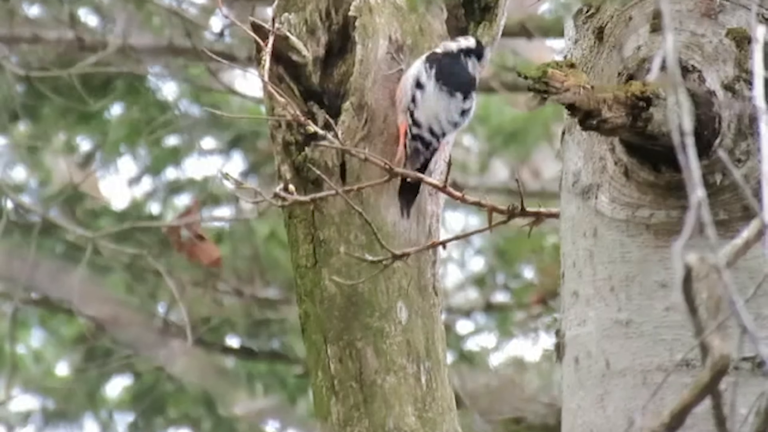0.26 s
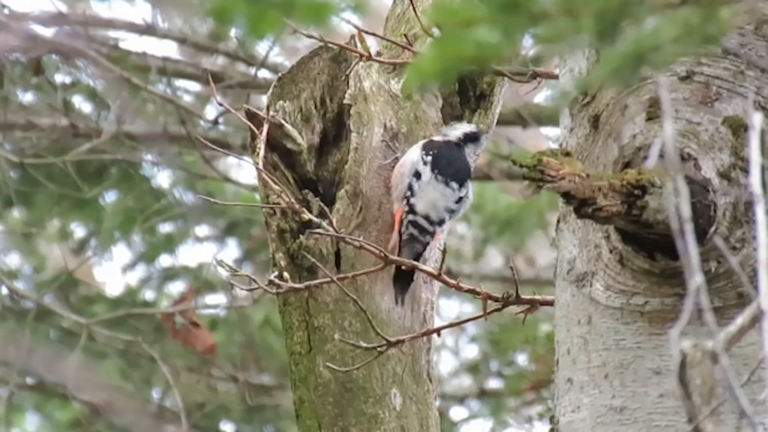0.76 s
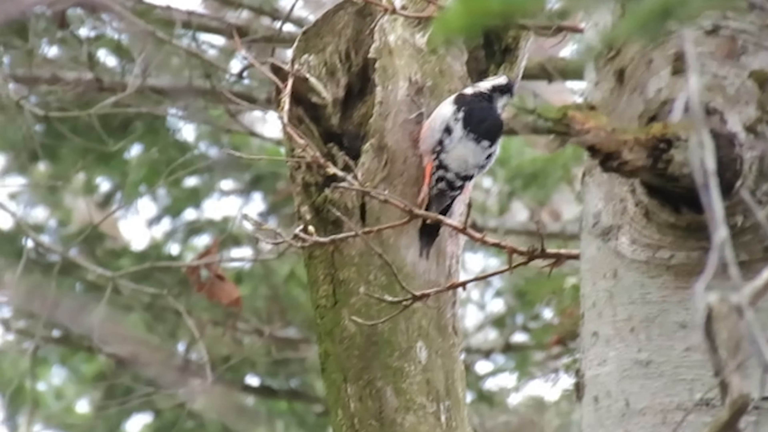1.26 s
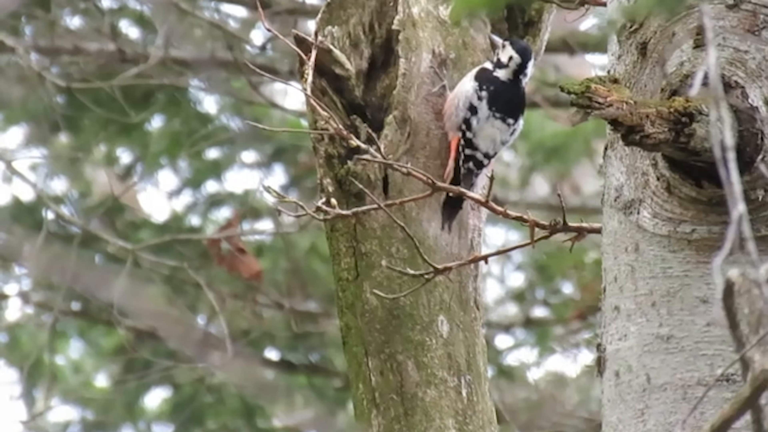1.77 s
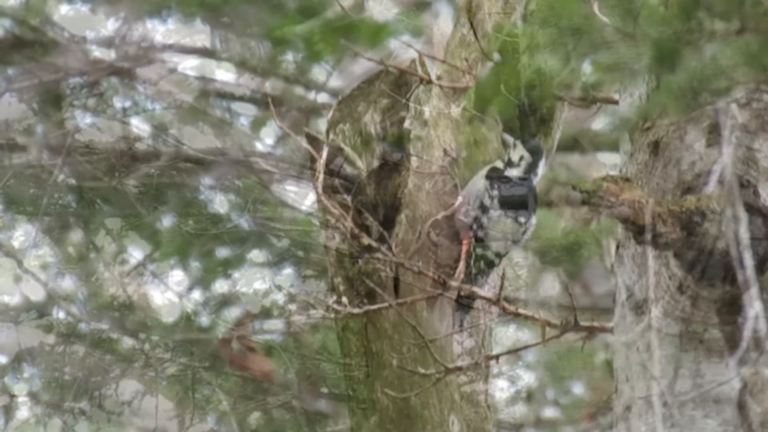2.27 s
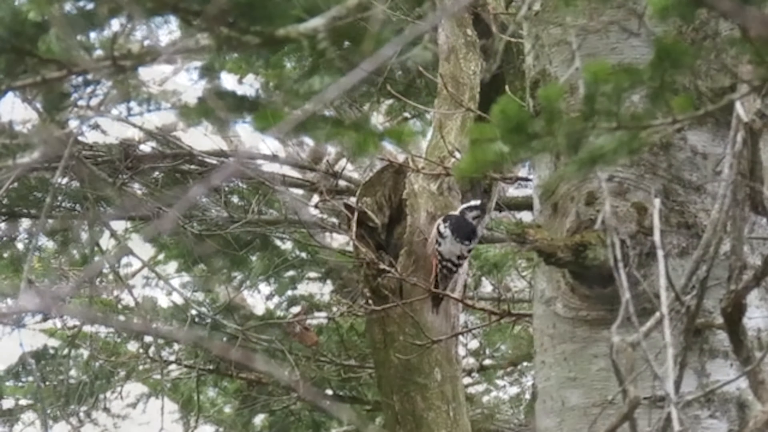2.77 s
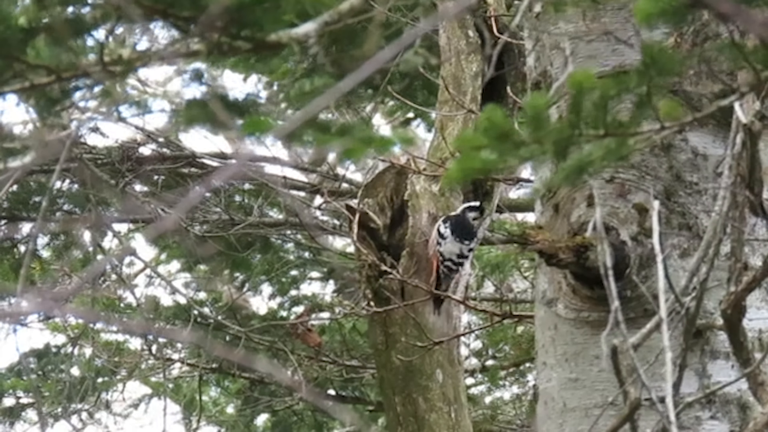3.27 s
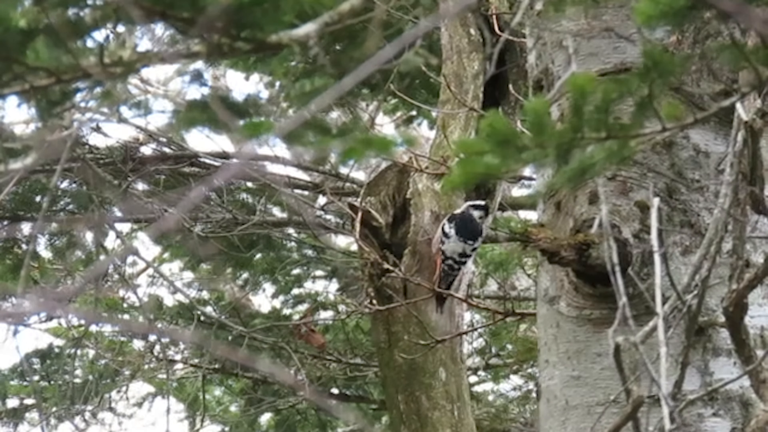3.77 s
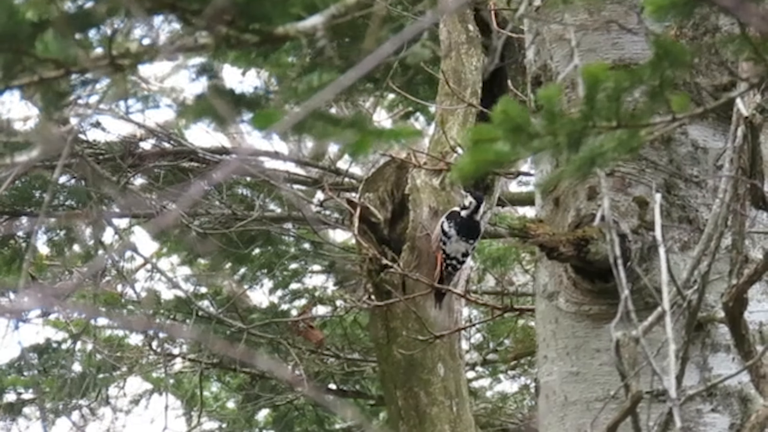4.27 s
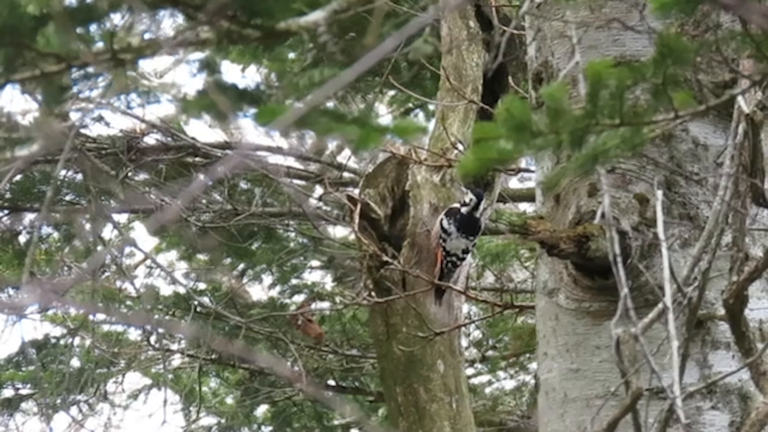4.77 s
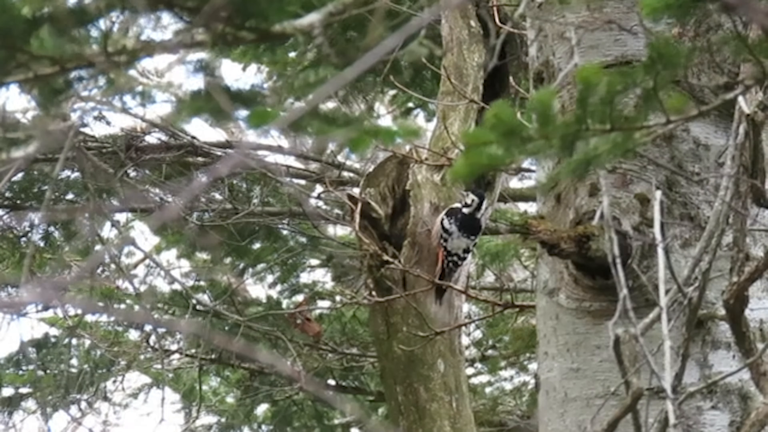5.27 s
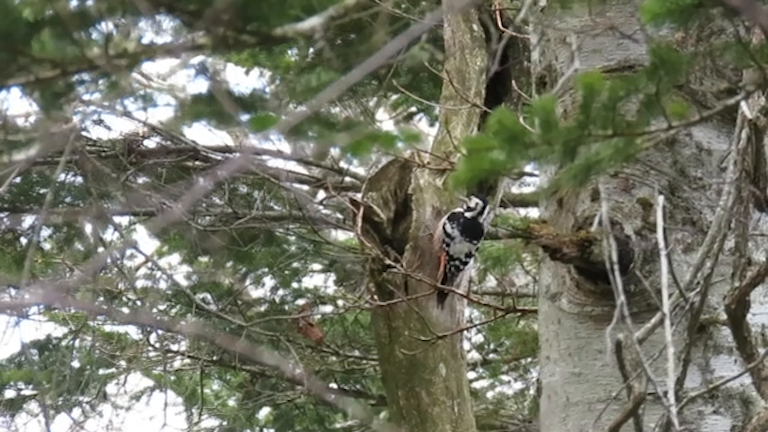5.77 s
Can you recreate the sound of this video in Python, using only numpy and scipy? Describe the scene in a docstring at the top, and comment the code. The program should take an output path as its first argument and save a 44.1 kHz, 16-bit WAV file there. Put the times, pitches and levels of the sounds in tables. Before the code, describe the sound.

Over a soft forest hush, hollow, bright-edged knocks run in a rapid roll that speeds up and dies away. Distant songbirds buzz and slur whistles in the pause. A second, similar roll follows over a very faint low drone, its echoes scattering among the trees. Afterwards, wind rumbles and flutters unevenly across the microphone's two sides, with bird whistles and distant caws.

```python
"""Two rolls of a woodpecker on a dead trunk in a conifer forest; each quickens and ends in weaker, softer blows.
Each blow rings the trunk's modes, echoes off near trunks and scatters in the forest; a tick precedes roll two.
Songbirds whistle, buzz and peep on gliding sines, and a far crow caws in filtered pulses.
Behind them lie a noise hush, a faint drone and hum, and turbulence.
After the second roll, gusts buffet the two microphone ports with short pressure swings."""
import sys
import numpy as np
from scipy import signal
from scipy.fft import rfft, irfft
from scipy.io import wavfile
from scipy.ndimage import uniform_filter1d

SR = 44100
rng = np.random.default_rng(int(sys.argv[2]) if len(sys.argv) > 2 else 0)


def to_wav(sig):
    """Store sig (one row per channel, or 1-D mono) as 16-bit WAV at the path in sys.argv[1].

    Samples outside -1..1 are clipped; the rate is SR.
    """
    pcm = np.clip(np.atleast_2d(sig), -1, 1) * 32767
    pcm = np.round(pcm).astype(np.int16)
    wavfile.write(sys.argv[1], SR, pcm.T)  # frames by channels


N = 265967
LEAD_S = 0.2  # head start: the opening blows ring into the scene


def from_db(db):
    """Decibels to gain."""
    return 10 ** (np.asarray(db) / 20)


def rms_one(x):
    """Scale to unit rms."""
    return x / np.sqrt(np.mean(x ** 2) + 1e-20)


def at_hz(points, hz):
    """Read a table on a log-frequency axis."""
    f, value = np.transpose(points)
    return np.interp(np.log(np.maximum(hz, 1)), np.log(f), value)


def cut(x, hz, kind, order=2):
    """Butterworth filter."""
    return signal.sosfilt(signal.butter(order, hz, kind, fs=SR, output="sos"), x)


def noise(spectrum):
    """Noise of unit rms with the given colour."""
    seconds = 8
    white = rfft(rng.standard_normal(seconds * SR))
    hz = np.arange(len(white)) / seconds
    return rms_one(irfft(white * from_db(at_hz(spectrum, hz)))[:N])


def slow_noise(cutoff_hz, length):
    """Low-passed noise, of unit rms over half a second, cut to length samples."""
    return rms_one(cut(rng.standard_normal(SR // 2), cutoff_hz, "low"))[:length]


def stereo(mid, side):
    """Left and right from mid and side."""
    return np.array([mid + side, mid - side])


def add(out, start_s, sound):
    """Mix a sound in from start_s on."""
    at = int(round(start_s * SR))
    first, last = max(at, 0), min(at + len(sound), len(out))
    if last > first:
        out[first:last] += sound[first - at:last - at]


def swell(length_s):
    """Time, progress and a nearly flat envelope with rounded ends for one call."""
    t = np.arange(int(length_s * SR)) / SR
    return t, t / length_s, np.sin(np.pi * t / length_s) ** 0.051


def glide(path_hz):
    """Sine along a frequency path: phase is the running sum of frequency."""
    return np.sin(2 * np.pi * np.cumsum(path_hz) / SR)


def chirp(path_hz, buzz_hz, buzz_cutoff_hz=300):
    """A whistle along a pitch path; a fast random wobble of pitch makes it buzzy."""
    return glide(path_hz + buzz_hz * slow_noise(buzz_cutoff_hz, len(path_hz)))


def hush(level_db=-51, side_db=-0.5):
    """Far air in the treetops: coloured noise, one common to both ears and one differing between them."""
    # Each row of both: frequency in Hz, relative level in dB.
    mid_colour = [(20, -12), (50, 3), (130, -6), (350, 0), (950, -3), (1500, -9.5), (2200, -13),
                  (3200, -20.5), (4300, -25.5), (8000, -32), (12000, -40), (14000, -46)]
    side_colour = [(20, -19), (60, -22), (200, 3), (350, 4.5), (700, -3.5), (1200, -7.5), (2200, -14.5),
                   (4300, -22.5), (8000, -29.5), (12000, -36), (14000, -41)]
    return from_db(level_db) * stereo(noise(mid_colour), from_db(side_db) * noise(side_colour))


def drone(db=-55.0, start_hz=78, end_hz=100, waver_hz=20, hum_db=-61, hum_hz=262, hum_waver_hz=18):
    """An unsteady low sine rises in pitch behind the second roll; a higher hum starts with it and stays on."""
    t = np.arange(N) / SR
    # Unsteadiness of pitch. Each row: frequency in Hz, relative level in dB.
    wander = [(15, 3.5), (60, -19.5), (300, -94.5)]
    path_hz = np.interp(t, [2.7, 3.5], [start_hz, end_hz]) + waver_hz * noise(wander)
    low_fade = np.interp(t, [2.6, 2.75, 4.1, 4.4], [0, 1, 1, 0])
    low = from_db(db) * low_fade * glide(path_hz)
    hum_fade = np.interp(t, [2.65, 2.75], [0, 1])
    hum = from_db(hum_db) * hum_fade * glide(hum_hz + hum_waver_hz * noise(wander))
    return low + hum


def wind(jitter_s=0.0026, spread_octaves=0.079, stir_db=-19):
    """A gust stirs turbulence and sheds eddies: short pressure swings that reach one port, then the other."""
    # Turbulence between gusts. Each row: time in seconds, level in dB.
    breeze = [(0, -68), (2.4, -73), (2.55, -54.5), (4.3, -74), (4.42, -42.5), (4.999, -60), (5.1, -46),
              (5.3, -46), (6.03, -41.5)]
    # Colour of the turbulence. Each row: frequency in Hz, relative level in dB.
    turbulence = [(15, -45), (45, -4), (90, -2), (150, -6), (205, -7.5), (260, -18), (400, -29),
                  (800, -54.5), (3000, -88.5)]
    # Each row: peak time in seconds, decay constant in seconds, eddy gain in dB, nominal eddy frequency in Hz.
    gusts = [(4.399, 0.003, -28, 80), (4.46, 0.025, -20.5, 110), (4.525, 0.01, -19, 133.7),
             (4.753, 0.013, -26.5, 86), (4.841, 0.022, -30.5, 129), (4.917, .008, -33.5, 122),
             (5.203, 0.084, -26.5, 115), (5.285, 0.032, -13.5, 149), (5.495, 0.02, -15, 168),
             (5.647, 0.017, -11.5, 146), (5.739, 0.014, -14.5, 160), (5.951, 0.0081, -17.5, 198)]
    eddy_gap_s, eddy_width_cycles, port_delay_s = 0.01875, 0.54, 0.0026
    clock = np.arange(N) / SR
    level = from_db(np.interp(clock, *np.transpose(breeze)))
    for peak_s, decay_s, db, hz in gusts:
        distance = np.minimum(np.abs(clock - peak_s) / decay_s, 20)
        level = level + from_db(db + stir_db) * np.exp(-distance)
    out = level * rms_one(stereo(noise(turbulence), noise(turbulence)))

    t = np.arange(-SR // 20, SR // 20) / SR
    for peak_s, decay_s, db, hz in gusts:
        for offset_s in eddy_gap_s * np.arange(-2, 3):
            late, size, way = rng.standard_normal(3)
            cycles = t * hz * 2 ** (spread_octaves * size)
            swing = np.sin(2 * np.pi * cycles) / np.cosh(cycles / eddy_width_cycles) ** 2
            eddy = from_db(db) * np.exp(-(offset_s / decay_s) ** 2) * swing
            at_s = peak_s + offset_s + jitter_s * late + t[0]
            lag_s = np.sign(way) * port_delay_s
            add(out[0], at_s - lag_s / 2, eddy)
            add(out[1], at_s + lag_s / 2, eddy)
    return out


def crow(pitch_hz=400, throat_hz=1200, rough=0.051):
    """Pulses with jittered pitch sound hoarse; only the main throat resonance carries this far."""
    # Each row: start in seconds, length in seconds, relative level in dB.
    caws = [(4.428, 0.059, -55.5), (4.829, 0.11, -59), (5.252, 0.157, -59), (5.701, 0.13, -57)]
    out = np.zeros(N)
    for start_s, length_s, db in caws:
        t, _, envelope = swell(length_s)
        jitter = slow_noise(150, len(t))
        turns = np.cumsum(pitch_hz * (1 + rough * jitter)) / SR
        pulses = np.diff(np.floor(turns), prepend=0)  # one pulse per whole turn
        throat = rms_one(cut(pulses, [throat_hz * 0.76, throat_hz * 1.137], "band"))
        add(out, start_s, from_db(db) * envelope * throat)
    return out


def far_songbirds(flutter_db=2.0, flutter_cutoff_hz=70):
    """Far birds: buzzy gliding notes, broken up in level on their way through the branches."""
    # Each row: start in seconds, length in seconds, start pitch in Hz, end pitch in Hz, relative level in dB,
    # rms buzz in Hz.
    trills = [(-.05, 0.26, 4670, 4620, -68.5, 90), (-.08, 0.28, 3910, 3860, -63.5, 370),
              (1.561, 0.12, 2525, 2890, -61.5, 170), (1.647, 0.11, 3315, 3190, -66, 170),
              (1.756, 0.056, 2930, 2980, -57.5, 60), (1.835, 0.042, 3100, 2960, -63.5, 90),
              (1.875, 0.041, 2470, 2790, -64, 80), (1.92, 0.066, 2800, 2800, -61, 119),
              (1.998, 0.091, 2380, 2310, -63, 178), (2.399, 0.15, 3020, 2820, -63, 260),
              (2.5, 0.034, 3220, 3700, -70, 200), (2.545, 0.022, 2854, 2904, -56, 159),
              (2.559, 0.025, 3560, 3620, -58, 300), (4.403, .07, 2900, 3350, -66, 170),
              (4.474, 0.095, 3330, 3110, -68, 172)]
    out = np.zeros(N)
    for start_s, length_s, start_hz, end_hz, db, buzz_hz in trills:
        t, progress, envelope = swell(length_s)
        flutter = flutter_db * slow_noise(flutter_cutoff_hz, len(t))
        path_hz = start_hz + (end_hz - start_hz) * progress
        add(out, start_s, from_db(db + flutter) * envelope * chirp(path_hz, buzz_hz))
    return out


def songbirds():
    """Near birds: whistles slur from pitch to pitch, and thin peeps settle exponentially onto a held pitch."""
    # One list per whistle. Each row: time in seconds, pitch in Hz, relative level in dB.
    whistles = [
        [(2.302, 2545, -58), (2.33, 2174, -57), (2.365, 2260, -64)],
        [(2.373, 2480, -56), (2.395, 3025, -52), (2.412, 2930, -61), (2.423, 2430, -53), (2.44, 2110, -53)],
        [(2.665, 2565, -54), (2.692, 2220, -54)],
        [(5.052, 2890, -55), (5.065, 2274, -48.5), (5.086, 3100, -66), (5.105, 1764, -51.5), (5.14, 1713, -61),
         (5.19, 1740, -72)],
        [(5.22, 1950, -50), (5.268, 2194, -57), (5.288, 3200, -61), (5.305, 4070, -66)],
        [(5.371, 3570, -66), (5.381, 2900, -57), (5.401, 2900, -66), (5.42, 1800, -51)],
    ]
    # Each row: start in seconds, length in seconds, held pitch in Hz, initial offset from it in Hz,
    # relative level in dB.
    peeps = [(.642, 0.2, 7550, -5.5, -81), (1.088, .17, 7970, 103, -82.5), (1.428, .19, 8130, 100, -85),
             (1.94, .09, 7200, 901, -84), (2.01, .03, 6000, 0, -77), (2.544, 0.047, 5550, 906, -70),
             (2.78, 0.097, 6500, 600, -79), (3.885, 0.17, 6300, 694, -80), (5.54, 0.083, 6750, 603, -79)]
    whistle_buzz_hz, slur_s, whistle_fade_s = 26, 0.0094, 0.0035
    peep_settle_s, peep_buzz_hz = 0.036, 70
    out = np.zeros(N)
    for curve in whistles:
        time_s, hz, db = np.transpose(curve)
        t = np.arange(time_s.min(), time_s.max(), 1 / SR)
        path_hz = uniform_filter1d(np.interp(t, time_s, hz), int(slur_s * SR))
        to_edge_s = np.minimum(t - t[0], t[-1] - t)
        fade = np.minimum(to_edge_s / whistle_fade_s, 1)
        add(out, t[0], from_db(np.interp(t, time_s, db)) * fade * chirp(path_hz, whistle_buzz_hz))
    for start_s, length_s, hz, offset_hz, db in peeps:
        t, _, envelope = swell(length_s)
        path_hz = hz + offset_hz * np.exp(-t / peep_settle_s)
        add(out, start_s, from_db(db) * envelope * chirp(path_hz, peep_buzz_hz))
    return out


def forest(x, near_db, near_s, onset_s, clump_db=1.5, clump_s=0.012):
    """The nearest stand scatters sound briefly, then a weaker tail comes from far off, in uneven clumps."""
    # Colour of the scatter. Each row: frequency in Hz, relative level in dB.
    scatter = [(250, 7.5), (350, 3.5), (420, -0.5), (470, 7.5), (520, -17), (590, -5), (680, -10),
               (820, -15.5), (960, -5), (1130, -3.5), (1300, -6), (1800, -10.5), (2200, -7), (2600, -1),
               (3500, -0.5), (4300, 0), (9000, -6.5)]
    # Decay. Each row: frequency in Hz, t60 in seconds.
    forest_t60 = [(250, 0.76), (450, 1.4), (600, 3.5), (750, 1.4), (1100, 1.7), (2200, 1.5), (4000, 1.3),
                  (8000, .3)]
    # Stereo width. Each row: frequency in Hz, side level over mid in dB.
    forest_width = [(250, -9.5), (600, -7), (1100, -12), (2200, -9.5), (6000, -3)]
    t = np.arange(int(1.2 * SR)) / SR
    onset = 1 - np.exp(-(t / onset_s) ** 2)
    shape = onset * (1 + from_db(near_db) / (1 + (t / near_s) ** 6))
    response, edges_hz = 0, np.geomspace(200, 10000, 23)
    for low, high in zip(edges_hz, edges_hz[1:]):
        hz = np.sqrt(low * high)
        clumps = np.interp(t / clump_s, np.arange(200), rng.standard_normal(200))
        fade = shape * from_db(clump_db * clumps - 60 * t / at_hz(forest_t60, hz))
        mid, side = cut(rng.standard_normal((2, len(t))), [low, high], "band") * fade
        band = stereo(rms_one(mid), from_db(at_hz(forest_width, hz)) * rms_one(side))
        response = response + band * np.sqrt(2 * (high - low) / SR / len(t))  # energy by bandwidth
    colour = from_db(at_hz(scatter, np.arange(SR + 1) / 2))
    response = irfft(rfft(response, 2 * SR) * colour)[:, :len(t)]
    return signal.fftconvolve(x[None], response, axes=1)[:, :len(x)]


def near_trees(x, bark_hz=3500):
    """The neighbouring trunks answer one after another, dulled by their bark."""
    # Each row: delay in seconds, gain in dB.
    echoes = [(0.00484, -14), (0.016, -15.5), (0.01627, -17.5), (0.01788, -21.5), (0.02365, -24),
              (0.02398, -20), (0.02471, -21.5), (0.02564, -21.5), (0.02646, -16), (0.02676, -19),
              (0.02976, -16), (0.0317, -21.5), (0.03662, -23.5), (0.03841, -24), (0.03941, -27),
              (0.04123, -24), (0.04775, -21), (0.04946, -19), (0.05437, -14), (0.05615, -23),
              (0.05743, -25), (0.06105, -19), (0.06271, -19.5), (0.06871, -22), (0.07306, -22),
              (0.08582, -21.5), (0.08664, -18), (0.09452, -25.5), (0.09832, -24.5), (0.12023, -23)]
    out, dulled = x.copy(), cut(x, bark_hz, "low", order=1)
    for delay_s, db in echoes:
        add(out, delay_s, from_db(db) * dulled)
    return out


def tick(db=-38, decay_s=0.0012):
    """One sharp dry tick, an exponential pulse, just before the second roll."""
    out = np.zeros(N)
    add(out, 2.6902, from_db(db) * np.exp(-np.arange(SR // 50) / SR / decay_s))
    return out


def drumming(vary_db=0.37, detune=0.0034, low_cut_hz=340, crunch_db=-37.0, crunch_hz=4100, crunch_s=0.002):
    """Every blow rings all modes of the trunk; a softer contact leaves out the high ones."""
    # Modes of the trunk. Each row: frequency in Hz, relative level in dB, t60 in seconds.
    trunk = [(344, -43.5, 0.047), (417.6, -38.5, 0.061), (529.6, -10.5, 0.0329), (553.3, -7, 0.025),
             (648.6, -19, 0.071), (655.1, -18, 0.052), (788, -46.5, 0.19), (1016.6, -10.5, .0182),
             (1023.4, -1.24, 0.0072), (1154.7, -16.5, 0.025), (1388, -51.5, .1), (1680, -35.5, 0.044),
             (1746, -11.5, 0.0027), (2523, -23.5, 0.013), (2561, -26.5, 0.013), (2986, -46.5, 0.036),
             (3250, -47.5, 0.017), (4030, -52.5, .014)]
    # Starting sign of each mode [+1 or -1].
    mode_sign = [1, -1, 1, -1, -1, 1, -1, -1, 1, -1, 1, 1, -1, 1, -1, 1, 1, -1]
    # Blows of the bill. Each row: time in seconds, relative strength in dB, contact low-pass in Hz.
    blows = [(-0.0563, 1, 2800), (0.0285, 1.5, 3080.0), (0.1101, 3, 3600.0), (0.1882, 3, 3970.0),
             (0.266, 4.5, 3500.0), (0.341, 4.5, 4500.0), (0.4132, 3.5, 3110.0), (0.4845, 4, 3180.0),
             (0.5558, 3.5, 2730.0), (0.623, 3.5, 2690.0), (0.6889, 2.5, 2500.0), (0.7533, 3, 2610.0),
             (0.8167, 2.5, 2470.0), (0.877, 2.0, 2730.0), (0.9385, 2.5, 2530.0), (0.9965, 1.2, 2320.0),
             (1.0539, 1.7, 2650.0), (1.1089, 0.6, 1950.0), (1.1635, 0.5, 2100.0), (1.2163, -0.3, 1970.0),
             (1.2657, -1.5, 1770.0), (1.3152, -0.6, 1790.0), (1.3634, -1.3, 1580.0), (1.4105, -1.5, 1680.0),
             (1.4568, -3.5, 1760.0), (1.5033, -5, 1580.0), (1.5484, -3, 1400.0), (1.5969, -6.5, 1440.0),
             (2.7068, -1.7, 2130.0), (2.7943, 1.5, 3250.0), (2.8788, 2.5, 3820.0), (2.9606, 3.5, 2980.0),
             (3.0383, 3.0, 3330.0), (3.1135, 3, 3450.0), (3.185, 2.5, 3100.0), (3.2535, 2, 4250.0),
             (3.3213, 2.5, 3190.0), (3.3875, 1.4, 2880.0), (3.4532, 1.6, 3530.0), (3.5156, -0.1, 3340.0),
             (3.5769, 0, 3190.0), (3.6362, 0.2, 3050.0), (3.695, 0.7, 2980.0), (3.7516, -0.2, 2800.0),
             (3.8091, -0.8, 2150.0), (3.8645, -1.7, 1960.0), (3.921, -1.5, 2840.0), (3.9743, -1, 2240.0),
             (4.0253, -2.7, 2520.0), (4.075, -2.5, 1990.0), (4.1259, -3.5, 1920.0), (4.1737, -4, 1240.0),
             (4.2279, -7.5, 1130.0)]
    out, t = np.zeros(N + int(LEAD_S * SR)), np.arange(SR // 10) / SR
    hz, level_db, t60_s = np.transpose(trunk)[:, :, None]
    decays = from_db(level_db - 60 * t / t60_s)
    # the bill lands on almost the same spot: strength and pitch shift only slightly
    strengths = mode_sign * from_db(vary_db * rng.standard_normal((len(blows), len(trunk))))
    pitches = hz * (1 + detune * rng.standard_normal((len(blows), 1, 1)))
    # crunch of the fibres
    bursts = rng.standard_normal((len(blows), len(t))) * np.exp(-t / crunch_s)
    crunches = from_db(crunch_db) * cut(bursts, crunch_hz, "low", order=5)
    for (blow_s, db, contact_hz), strength, pitch, crunch in zip(blows, strengths, pitches, crunches):
        ring = strength @ (decays * np.sin(2 * np.pi * pitch * t))
        add(out, LEAD_S + blow_s, from_db(db) * cut(ring + crunch, contact_hz, "low"))
    return cut(out + 1e-18, low_cut_hz, "high")


def scene():
    """The woodpecker is near and clear; the other birds are heard largely through the trees."""
    drum, song, far_song = drumming(), songbirds(), far_songbirds()
    drum_scatter = forest(drum, near_db=-1.5, near_s=0.16, onset_s=0.011)
    woodpecker = (near_trees(drum) + from_db(-0.5) * drum_scatter)[:, -N:]  # drops the head start
    calls = from_db(5.0) * song + from_db(1.5) * far_song + from_db(13.0) * crow()
    scattered = forest(calls, near_db=-1.5, near_s=0.037, onset_s=0.0033)
    birds = from_db(4.5) * song + from_db(2.5) * far_song + scattered
    return hush() + drone() + wind() + birds + tick() + woodpecker


def record(dry):
    """A steep elliptic low-pass cuts the top."""
    cutoff_hz, ripple_db, stop_db = 13600, 0.2, 70
    return signal.sosfilt(signal.ellip(8, ripple_db, stop_db, cutoff_hz, fs=SR, output="sos"), dry)


dry = scene()
out = record(dry)
to_wav(out)
```